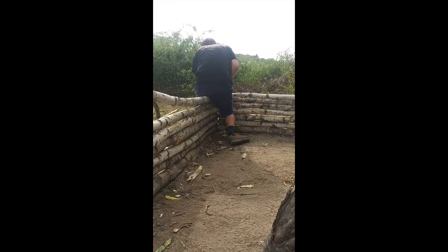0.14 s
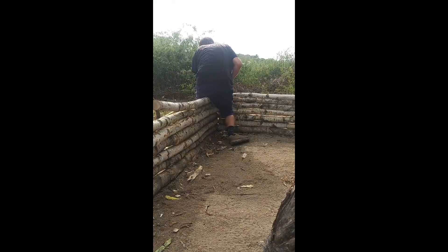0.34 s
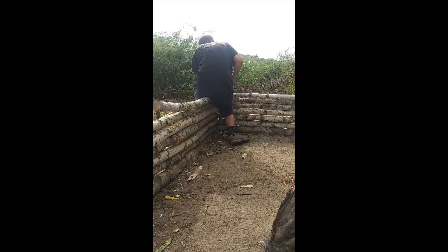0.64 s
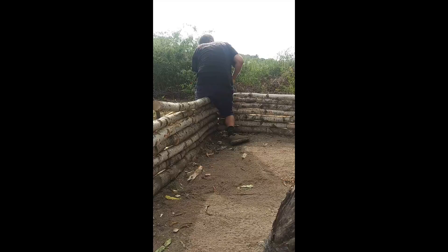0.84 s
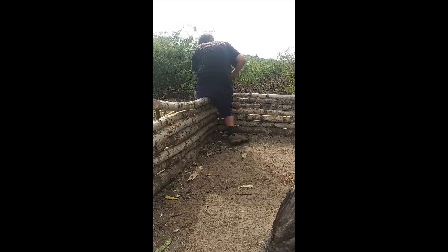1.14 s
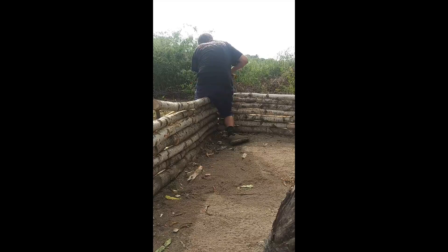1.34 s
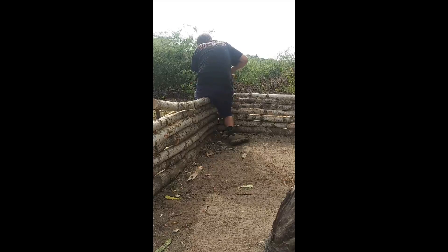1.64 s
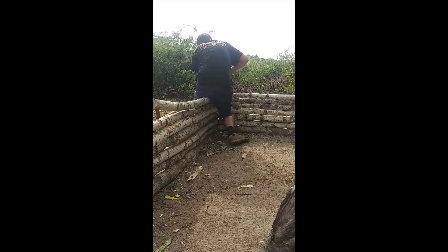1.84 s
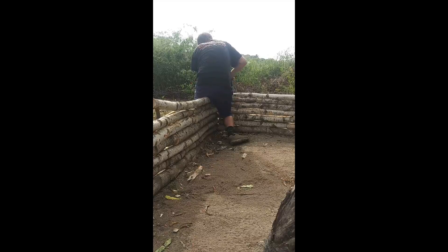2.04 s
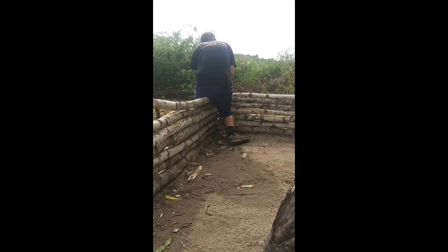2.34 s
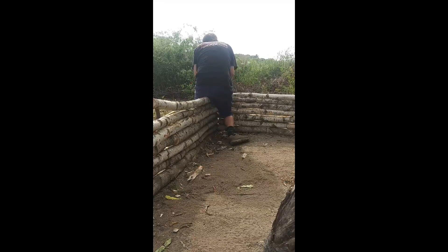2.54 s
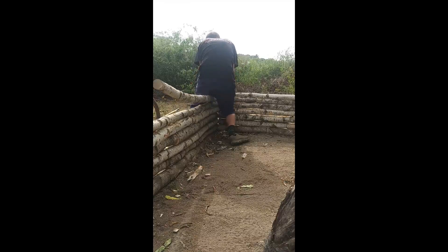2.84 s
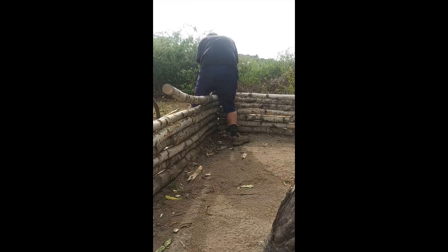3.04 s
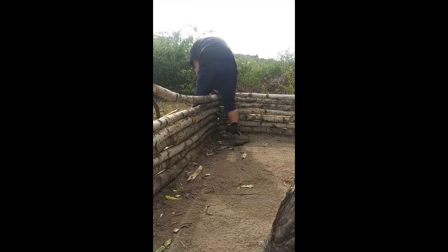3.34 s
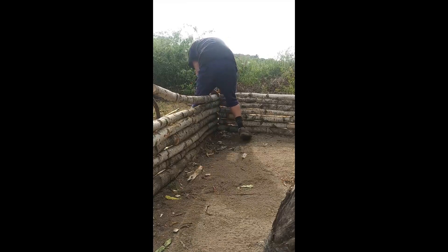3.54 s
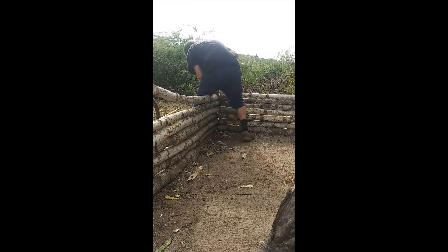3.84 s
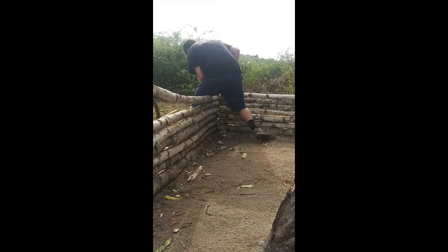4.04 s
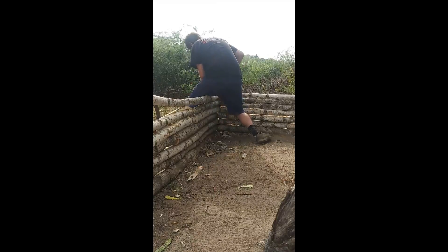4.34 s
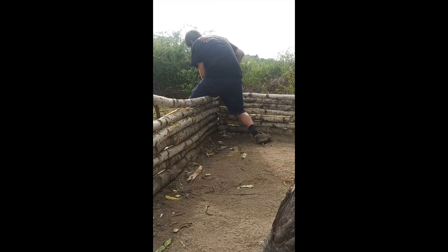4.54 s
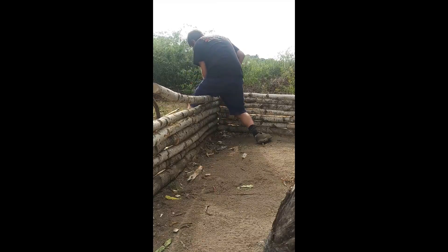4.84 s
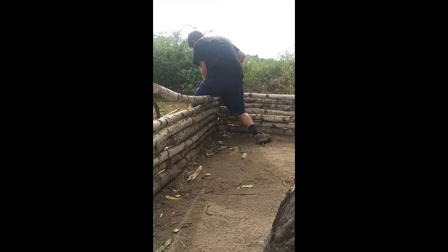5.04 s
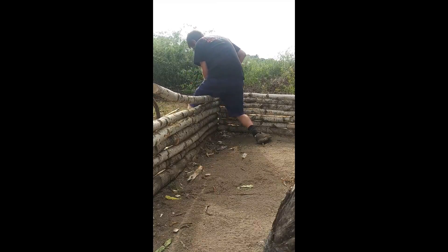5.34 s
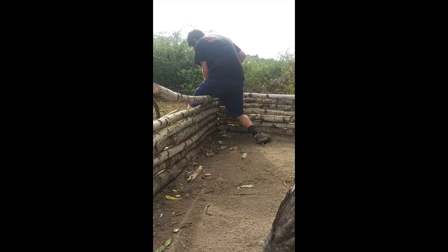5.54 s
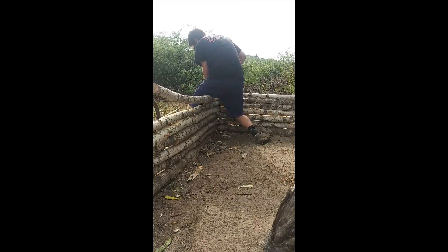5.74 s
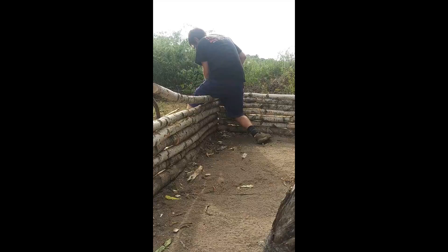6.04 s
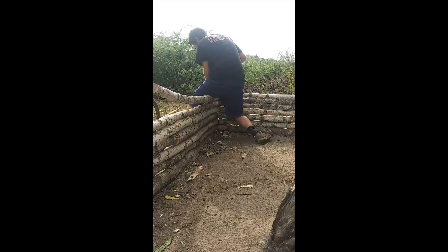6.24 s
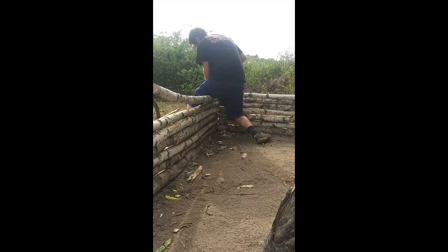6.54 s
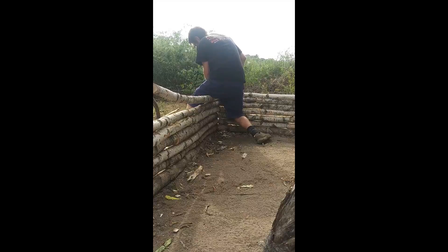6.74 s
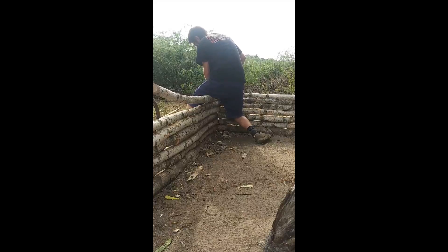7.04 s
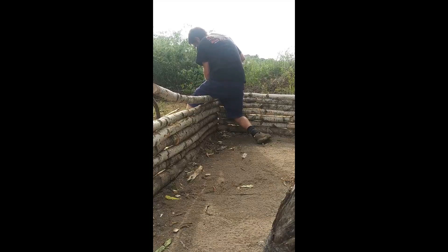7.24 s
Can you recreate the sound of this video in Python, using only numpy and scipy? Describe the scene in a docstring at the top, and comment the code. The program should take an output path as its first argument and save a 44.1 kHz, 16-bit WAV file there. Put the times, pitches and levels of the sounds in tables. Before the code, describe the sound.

A hammer drives a nail into a low log wall outdoors. After quiet insect chirring and a soft bump come three blows, the first very faint. A pause holds small bumps, gritty scuffs and dry ticks as the worker shifts his footing. Then six loud wooden knocks follow at three a second, each with a short steel crack and low thud. Close, clear pickup with little echo.

```python
"""A hammer drives a nail into a low wall of logs outdoors: three trial blows, then six hard ones, three a second.
Each blow is a short wooden knock with ringing log tones, noise bursts for the nail and low tones for the stack.
Fading noise stands for the sound that the log walls scatter back.
Between the runs the worker shifts his footing: short noise bursts make soft bumps, gritty scuffs and dry ticks.
Insects chirr all along as throbbing narrow bands of noise, over a faint bed of outdoor air noise."""
import sys
import numpy as np
from scipy import signal
from scipy.fft import rfft, irfft
from scipy.io import wavfile
from scipy.ndimage import uniform_filter1d

SR = 44100
rng = np.random.default_rng(int(sys.argv[2]) if len(sys.argv) > 2 else 0)


def wav_record(signal):
    """Record a signal, one row per channel, as 16-bit PCM in the file named by sys.argv[1]."""
    frames = np.transpose(np.atleast_2d(signal))
    bounded = np.clip(frames, -1, 1)
    # unit amplitude maps onto the largest positive 16-bit level
    quanta = np.round(bounded * 32767).astype(np.int16)
    wavfile.write(sys.argv[1], SR, quanta)


N = 325898
t = np.arange(N) / SR
age = t[:SR // 2]  # seconds since a short sound began


# hammer blows; force and glance also steer the stack and the nail's ring, and the levels are relative:
# start_s, force_db, glance_db (higher is more glancing), crack_db, nail_ring_hz, nail_buzz_db
BLOWS = [(1.5873, -34, -0.5, -34.5, 7160, -35.5), (1.8691, -16, 0.5, -27, 7260, -51),
         (2.11, -14, 1, -29.5, 6900, -30), (5.558, -12.5, -2.5, -22.5, 7500, -33),
         (5.902, -10, -2, -21, 7240, -47), (6.2285, -8.5, 1, -16, 10000, -32),
         (6.552, -7.5, 3, -15, 5600, -29), (6.885, -7.5, 6.5, -15.5, 6200, -6.5),
         (7.208, -8.5, -4, -11, 7600, -18.5)]


def hammering():
    """Each blow sinks the nail by its energy; all land near one spot, so the log rings nearly alike."""
    out = np.zeros(N)
    spot_phases = rng.random(len(LOG_MODES))
    energy = undb(np.array(BLOWS)[:, 1]) ** 2
    # share of all the energy spent before each blow
    depths = (np.cumsum(energy) - energy) / np.sum(energy)
    for (start_s, *swing), depth in zip(BLOWS, depths):
        aim = 0.2 * rng.standard_normal(len(LOG_MODES))
        add(out, start_s, blow(spot_phases + aim, **stroke(*swing, depth)))
    return out


def stroke(force_db, glance_db, crack_db, nail_hz, buzz_db, depth):
    """How force, aim and the nail's depth (0 loose, 1 driven) share a blow out among log, stack and steel."""
    # a glancing blow shakes the stack less, and so does a driven nail
    thud_db = -13 + 0.59 * force_db - glance_db - 3.5 * depth
    # a glancing blow shakes the nail more
    nail_db = -25 + 0.48 * force_db + glance_db
    return dict(knock_db=force_db, thud_db=thud_db, nail_db=nail_db,
                crack_db=crack_db + 1.5, buzz_db=buzz_db - 9,
                knock_top_hz=1800 + 1450 * depth,
                nail_hz=nail_hz,
                buzz_hz=2980 - 55 * glance_db,  # drops as a glancing blow bends the shank
                length=0.88 * (1 + 0.015 * glance_db))


def blow(phases, knock_db, knock_top_hz, thud_db, crack_db, nail_hz, nail_db, buzz_hz, buzz_db, length):
    """One blow: the log knocks and rings, the nail cracks and buzzes, the stack shudders."""
    wood = struck_wood(phases, knock_top_hz, length)
    crack = nail_crack(length)
    nail = burst(band(nail_hz, 1400, len(age)), fade(rise=0.0014, t60=0.22 * length, delay=0.0023))
    buzz = burst(band(buzz_hz, 510, len(age)), fade(rise=0.002, t60=0.16, delay=0.00078))
    steel = undb(crack_db) * crack + undb(nail_db) * nail + undb(buzz_db) * buzz
    return undb(knock_db) * wood + steel + undb(thud_db) * stack_thud()


# tones of the struck log; a blow shifts pitch and level slightly and scales the ring:
# pitch_hz, relative_level_db, base_time_to_fall_60_db_s
LOG_MODES = [(344, -6, .12), (433, -6, .12), (487, -5, .11), (594, -4, .1), (632, -7, .08), (740, -5, .07),
             (778, -1, .09), (850, -4, .07), (942, -6, .08), (998, -2, .09), (1095, -7, .08),
             (1200, -5, .09), (1383, -6, .12), (1440, -5, .1), (1534, -5, .09), (1636, -2, .095),
             (1709, -4, .09), (1771, -3, .095), (1905, -3, .095), (2042, -3, .1), (2272, -6, .11),
             (2333, -2, .1), (2532, -2, .12), (2621, -6, .11), (2802, -4, .13), (2944, -7, .14),
             (3103, -8, .13)]
# colour of the sound scattered back by the log walls: pitch_hz, relative_level_db
SCATTER_COLOUR = [(40, -49), (100, -0.5), (200, 3), (400, 10), (800, -1), (1200, 0), (2000, 6.5),
                  (3000, -41), (5000, -37), (16000, -56)]


def struck_wood(phases, knock_top_hz, length):
    """The log's knock and ring, its crunching fibres and the scattered sound, dulled by a soft contact."""
    log = ring(LOG_MODES, phases, rise=0.0024, length=length, detune=0.0042)
    scatter = burst(coloured(SCATTER_COLOUR, len(age)), fade(rise=0.006, t60=0.13 * length))
    # fibres give way as the nail sinks in
    crunch = burst(band(1890, 1540, len(age)), fade(rise=0.00082, t60=0.018, delay=0.0037))
    wood = undb(17) * knock() + undb(-0.5) * log + undb(-6.5) * scatter + undb(6.5) * crunch
    # the firmer the nail sits, the shorter the contact and the higher the knock reaches
    return signal.sosfilt(signal.butter(4, knock_top_hz, fs=SR, output="sos"), wood)


# quickly dying tones of the wood under the hammer; each blow shifts pitch and level:
# pitch_hz, relative_level_db, time_to_fall_60_db_s
KNOCK_MODES = [(464, -18, 0.019), (752, -1, 0.0098), (852, 0, 0.016), (1255, 2, 0.0074), (1697, 0, 0.014),
               (2295, 0.5, .016), (3225, -12.5, 0.031)]


def knock():
    """The wood's first swing, peaking just after contact, and its bounces off wall and ground."""
    phases = cresting(KNOCK_MODES, crest_s=0.002505)
    direct = ring(KNOCK_MODES, phases, rise=0.0023, length=1, detune=0.051)
    return direct + 0.2 * late(direct, 0.0063) + 0.16 * late(direct, 0.0127)


# average colour of the nail's crack: pitch_hz, relative_level_db
CRACK_COLOUR = [(1000, -2.5), (3000, 0), (4200, -5.5), (5200, -5), (6800, 4), (9500, -0.5), (12800, -16),
                (14200, -24), (15900, -30)]


def nail_crack(length):
    """The steel touches, snaps home, and returns grainily from logs and ground."""
    touch = undb(-16) * fade(rise=0.00012, t60=0.018)
    snap = undb(1) * fade(rise=0.00072, t60=0.02, delay=0.0034)
    back = undb(-5) * fade(rise=0.014, t60=0.19 * length, delay=0.003)
    noise = splintered(coloured(CRACK_COLOUR, len(age)), ripple_db=3.5)
    return burst(noise * grit(swing_db=1.8, size=50), touch + snap + back)


def splintered(x, ripple_db):
    """Each crack of the fibres has its own uneven colour."""
    hz = np.arange(0, SR / 2, 350)
    db = ripple_db * rng.standard_normal(len(hz))
    return unit(shape(x, lambda f: undb(np.interp(f, hz, db))))


# low tones of the whole stack; each blow shifts pitch and level slightly:
# pitch_hz, relative_level_db, time_to_fall_60_db_s
STACK_MODES = [(78, -11, 0.29), (94.7, -6.5, 0.22), (114.7, -6.5, 0.34), (166.8, -1, 0.24),
               (192.4, 4.5, 0.15), (206, 4, 0.16), (259.2, -3, 0.19), (294, -8.5, 0.22), (369, -3.5, 0.098)]


def stack_thud():
    """The heavy stack takes some cycles to reach its widest swing."""
    phases = cresting(STACK_MODES, crest_s=0.01964)
    return ring(STACK_MODES, phases, rise=0.014, length=1, detune=0.014, delay=0.0082)


def shifting():
    """The worker shifts his footing, bumping, scuffing and crackling against what he touches."""
    return bumps() + scuffs() + ticks()


# boots and knees bumping the logs: start_s, level_db, centre_hz
BUMPS = [(0.616, -42, 238), (2.984, -40.5, 170), (2.987, -44.5, 430), (4.186, -44.5, 162)]


def bumps():
    """A soft knock against a log is a low band of noise that dies away."""
    out = np.zeros(N)
    for start_s, level_db, hz in BUMPS:
        noise = band(hz, 0.56 * hz, len(age))
        add(out, start_s, undb(level_db) * burst(noise, fade(rise=0.0034, t60=0.18)))
    return out


# soles and cloth scuffing over soil and bark: start_s, level_db, centre_hz, time_to_fall_60_db_s
SCUFFS = [(2.957, -46, 1000, 0.15), (3.16, -48, 780, .38), (3.712, -44, 1900, .26),
          (3.924, -43.5, 1440, 0.095), (4.05, -46, 800, 0.16), (4.266, -42.5, 2100, 0.11)]


def scuffs():
    """Dull gritty rubbing; the longer a contact lasts, the more slowly it starts."""
    out = np.zeros(N)
    soft = signal.butter(4, 3500, fs=SR, output="sos")
    for start_s, level_db, hz, t60 in SCUFFS:
        scuff = rub(hz, width=1.6 * hz, rise=0.22 * t60 ** 2, t60=t60)
        add(out, start_s, undb(level_db) * signal.sosfilt(soft, scuff))
    return out


# dry twigs and leaves crackling: start_s, level_db, time_to_fall_60_db_s
TICKS = [(0.888, -58, .17), (3.418, -55, .03), (4.476, -54, .025)]


def ticks():
    """Bright grainy noise; the longer a tick lasts, the more slowly it starts."""
    out = np.zeros(N)
    for start_s, level_db, t60 in TICKS:
        add(out, start_s, undb(level_db) * rub(9300, width=4500, rise=0.03 * t60, t60=t60))
    return out


def rub(hz, width, rise, t60):
    """One short, grainy contact."""
    return burst(band(hz, width, len(age)), fade(rise, t60) * grit(swing_db=3, size=200))


# insect choirs; the pulse rate wavers, and a negative swing starts a pulse downwards:
# centre_hz, width_hz, level_before_swell_db, average_pulses_per_s, pulse_swing_db
INSECTS = [(8413, 120, -57, 31, 5), (8236, 330, -54.5, 86, -1), (7850, 530, -56, 17, -1),
           (7220, 1660, -58.5, 29, -2), (4341, 154, -60.5, 55.7, 2.5), (4157, 500, -59, 42, 0)]
# loudness change of the whole chorus, easing off and then swelling: time_s, change_db
CHORUS_SWELL = [(0, 0.6), (5.2, -0.53), (7.39, 1.5)]


def insects():
    """Each choir is a narrow resonance throbbing at the stroke rate of its nearest singer."""
    chorus_db = np.interp(t, *np.transpose(CHORUS_SWELL))
    # all the pulse rates waver together by about one percent
    beat_s = t + np.cumsum(0.01 * drift(3.2)) / SR
    out = 0
    for hz, width, level_db, rate, swing_db in INSECTS:
        throb = undb(swing_db * np.sin(2 * np.pi * rate * beat_s))
        swell_db = chorus_db + 0.25 * drift(9.7)
        out = out + undb(level_db + swell_db) * unit(band(hz, width, N) * throb)
    return out


# colour of the outdoor air: pitch_hz, relative_level_db
AIR_COLOUR = [(25, -19), (40, -10), (55, -6.5), (90, 5), (160, 2), (280, -6), (500, -7), (900, -4),
              (1500, -9.5), (2300, -12.5), (2900, -8), (3600, -14.5), (5200, -24), (9500, -35.5),
              (15500, -27)]


def air():
    """Far-off rumble and leaves: coloured noise, nearly steady."""
    flutter_db = 0.4 * drift(8)
    return coloured(AIR_COLOUR, N) * undb(-54.5 + flutter_db)


def undb(db):
    """Decibels to gain."""
    return 10 ** (np.asarray(db) / 20)


def unit(x):
    """Scale to an rms (average strength) of 1."""
    return x / np.sqrt(np.mean(x ** 2))


def shape(x, gain):
    """Filter by a gain that is a function of frequency."""
    hz = np.maximum(np.fft.rfftfreq(len(x), 1 / SR), 1)
    return irfft(rfft(x) * gain(hz), len(x))


def coloured(points, size):
    """Noise with a spectrum of (Hz, dB) points."""
    hz, db = np.transpose(points)
    noise = rng.standard_normal(size)
    return unit(shape(noise, lambda f: undb(np.interp(np.log(f), np.log(hz), db))))


def band(hz, width, size):
    """Noise in a double resonance, about width (Hz) across at half gain."""
    noise = rng.standard_normal(size)
    return unit(shape(noise, lambda f: 1 / (1 + ((f - hz * hz / f) / (1.004 * width)) ** 2)))


def drift(rate):
    """Slow random drift with spread 1; a higher rate (Hz) lets it move faster."""
    return unit(shape(rng.standard_normal(N), lambda f: (f > 1) * np.exp(-f / rate)))


def grit(swing_db, size):
    """A quickly jumping gain that breaks noise into grains; size (samples) smooths the jumps."""
    jumps = uniform_filter1d(rng.standard_normal(len(age)), size=size)
    return undb(swing_db * unit(jumps))


def fade(rise, t60, delay=0):
    """A smooth rise and an exponential decay by 60 dB in t60 (all in s)."""
    a = np.maximum(age - delay, 0)
    return (1 - np.exp(-(a / rise) ** 2)) * np.exp(-np.log(1000) * a / t60)


def burst(noise, envelope):
    """Noise under an envelope, its energy set by the envelope alone."""
    x = noise * envelope
    return x * np.sqrt(np.sum(envelope ** 2) / np.sum(x ** 2))


def ring(modes, phases, rise, length, detune, delay=0):
    """Decaying tones; each blow lands a little differently and shifts their pitch and strength."""
    out = 0
    for (hz, db, t60), phase in zip(modes, phases):
        cycles = hz * (1 + detune * rng.standard_normal()) * age + phase
        strength = undb(db + 0.42 * rng.standard_normal())
        out = out + strength * np.sin(2 * np.pi * cycles) * fade(rise, t60 * length, delay)
    return out / np.sqrt(np.sum(undb(np.array(modes)[:, 1]) ** 2))


def cresting(modes, crest_s):
    """Phases (cycles) of tones that one push brings to their crest together."""
    return [0.25 - hz * crest_s for hz, _, _ in modes]


def late(x, lag):
    """The same sound, lag seconds later."""
    return np.interp(age - lag, age, x, left=0)


def add(track, s, sound):
    """Mix a sound into the track at time s."""
    i = int(s * SR)
    track[i:i + len(sound)] += sound[:N - i]


def scene():
    """Hammer and footing in front, insects and air behind."""
    return (hammering() + shifting() + insects() + air())[None]


def record(dry):
    """Round the loudest peaks, shed the deep bass and cut the top of the treble."""
    ceiling = 0.95
    rounded = ceiling * np.tanh(dry / ceiling)
    no_rumble = signal.sosfilt(signal.butter(2, 45, "high", fs=SR, output="sos"), rounded)
    return signal.sosfilt(signal.ellip(8, 0.2, 70, 15900, fs=SR, output="sos"), no_rumble)


dry = scene()
out = record(dry)
wav_record(out)
```